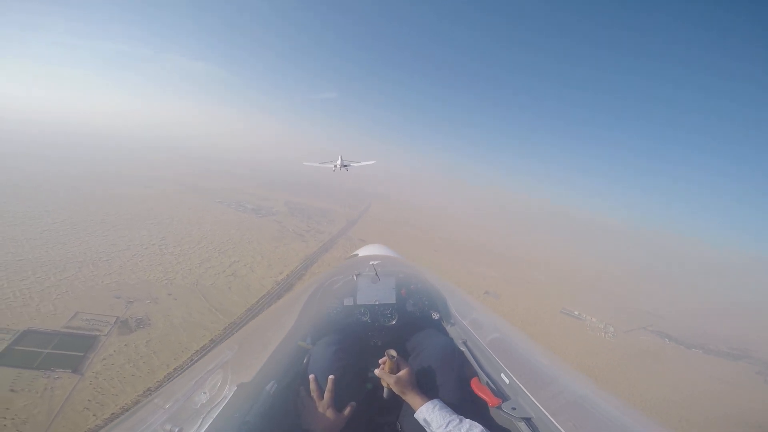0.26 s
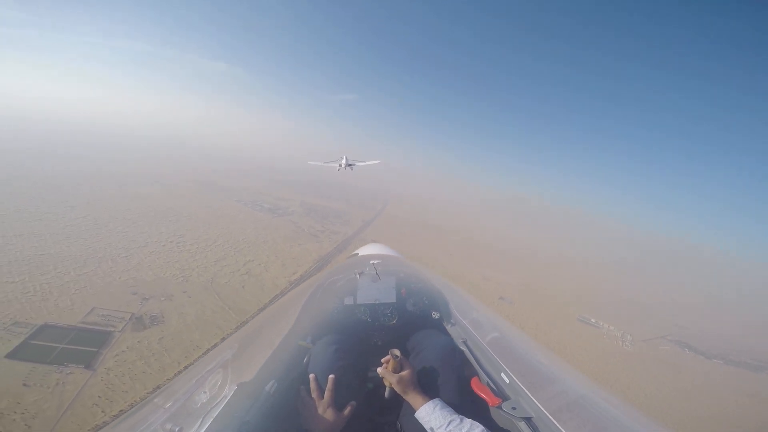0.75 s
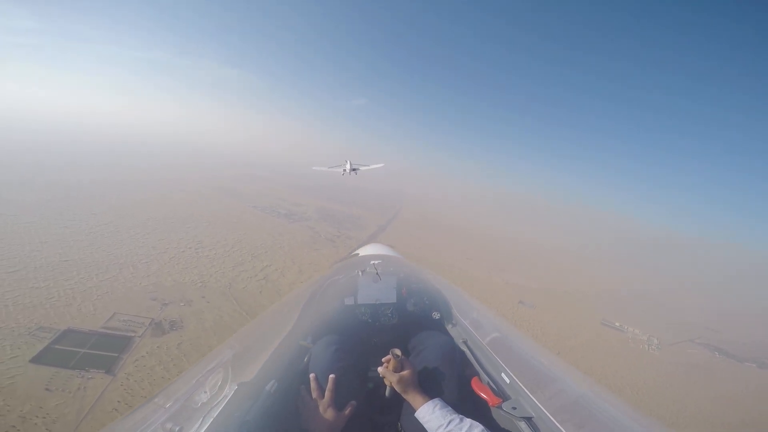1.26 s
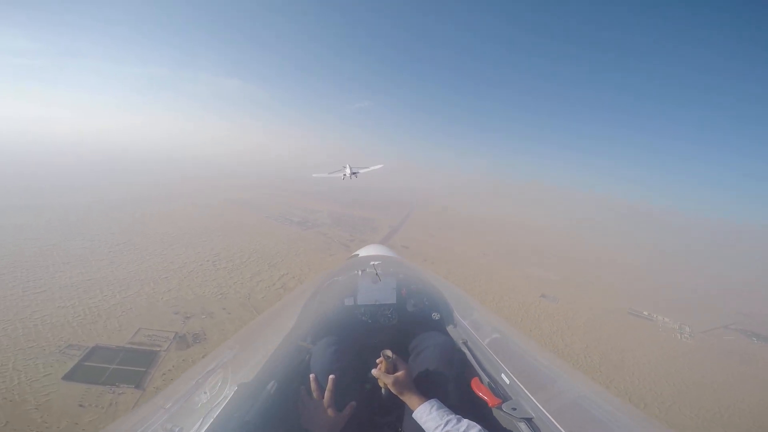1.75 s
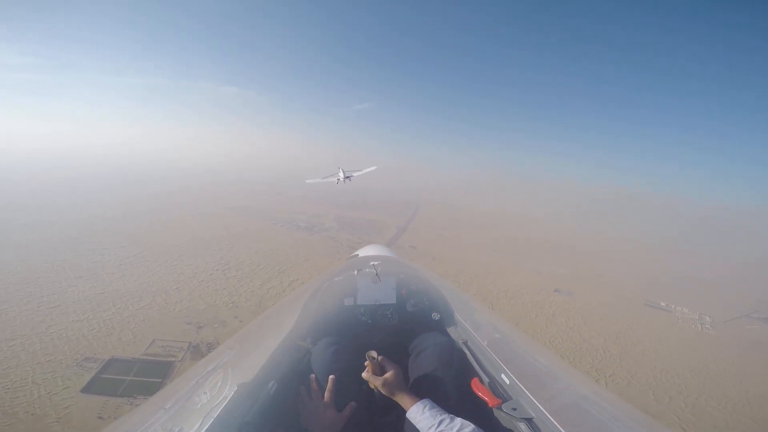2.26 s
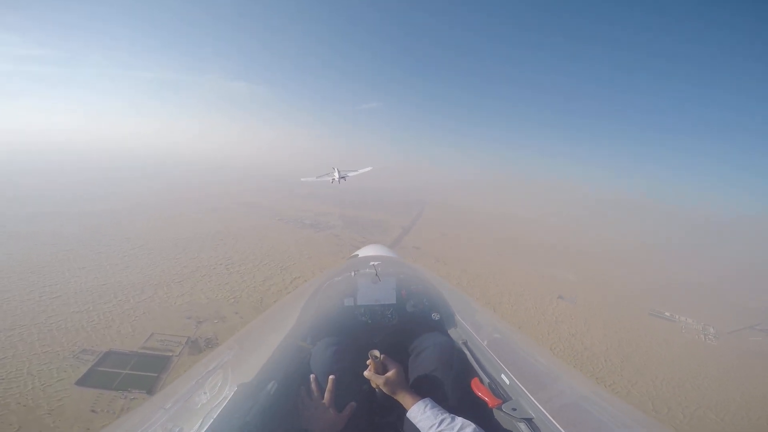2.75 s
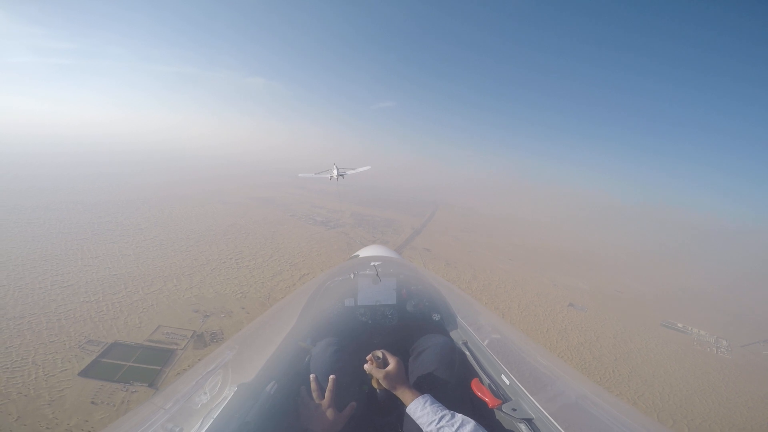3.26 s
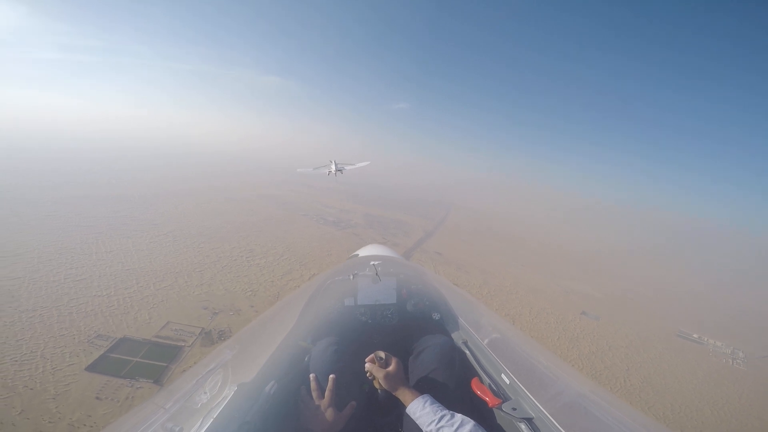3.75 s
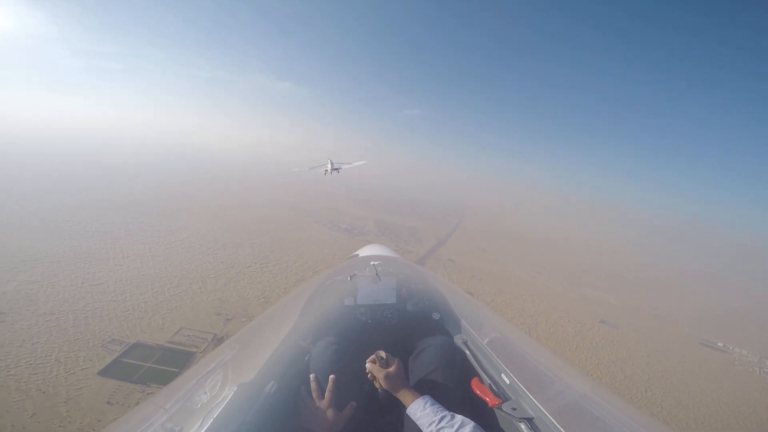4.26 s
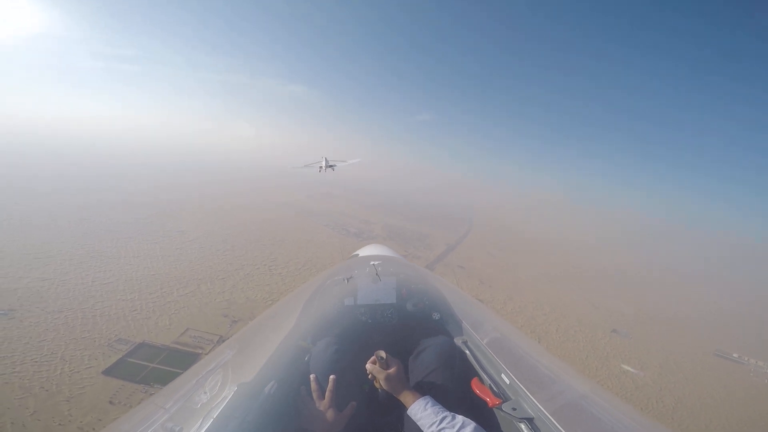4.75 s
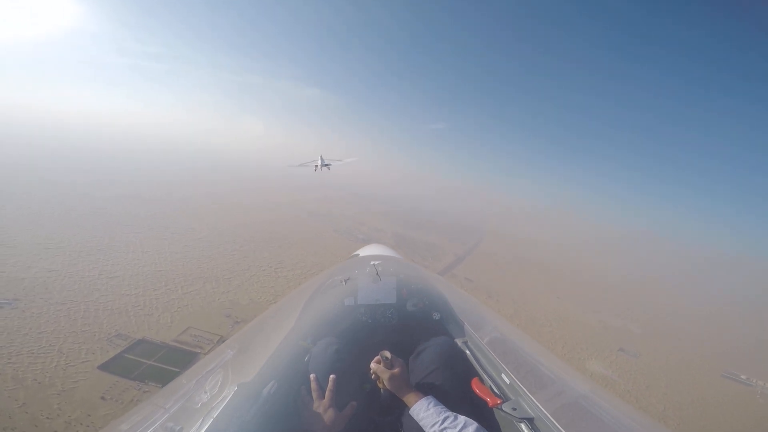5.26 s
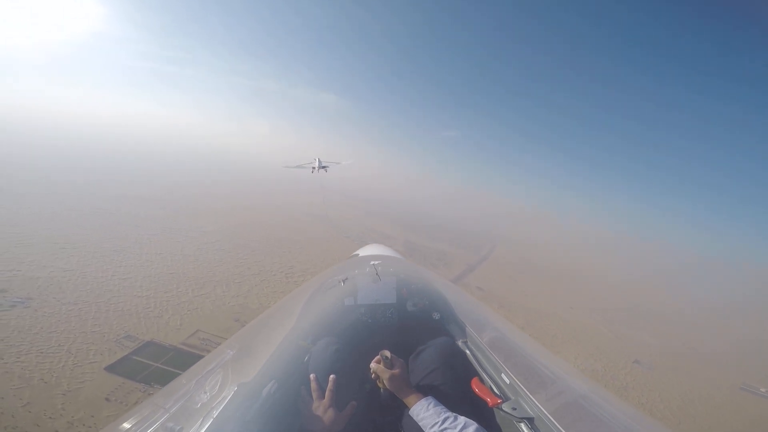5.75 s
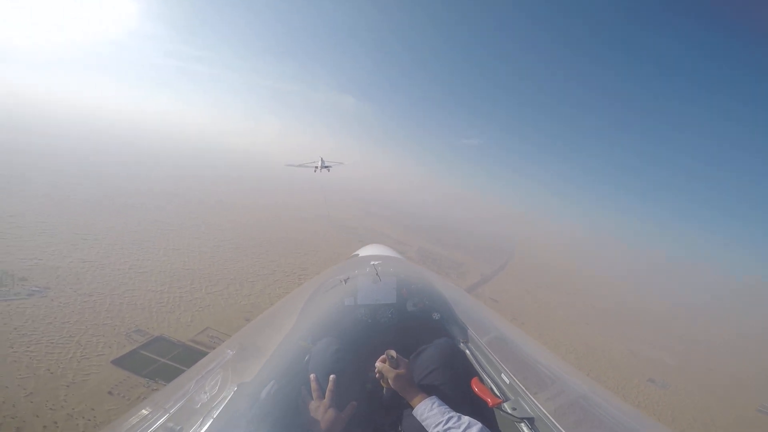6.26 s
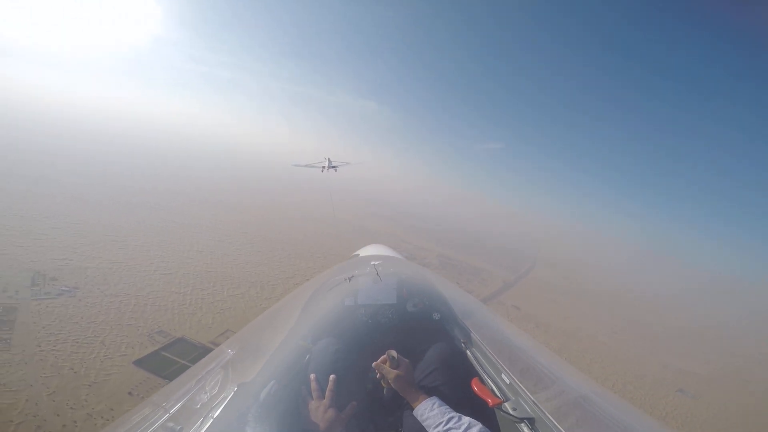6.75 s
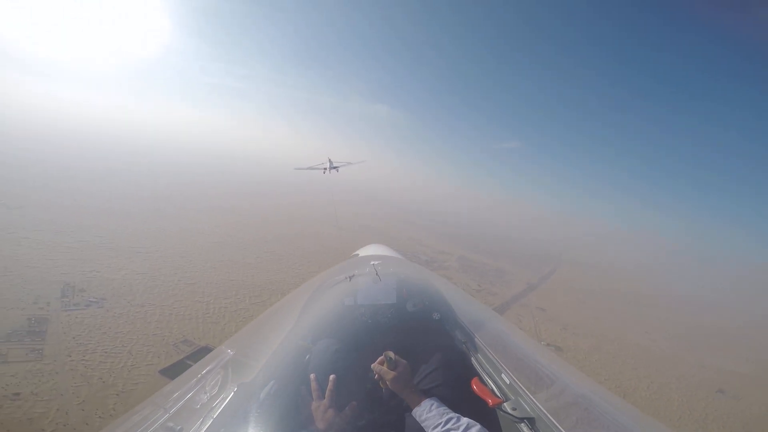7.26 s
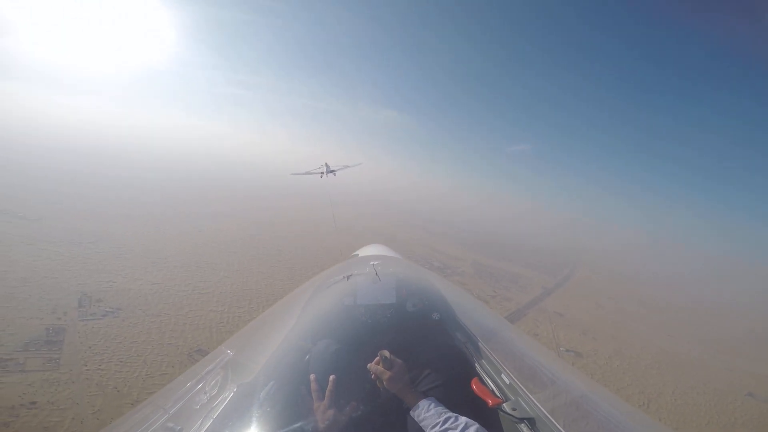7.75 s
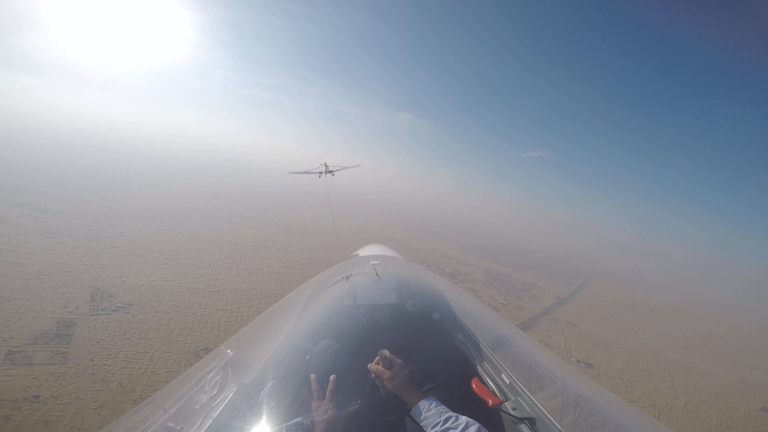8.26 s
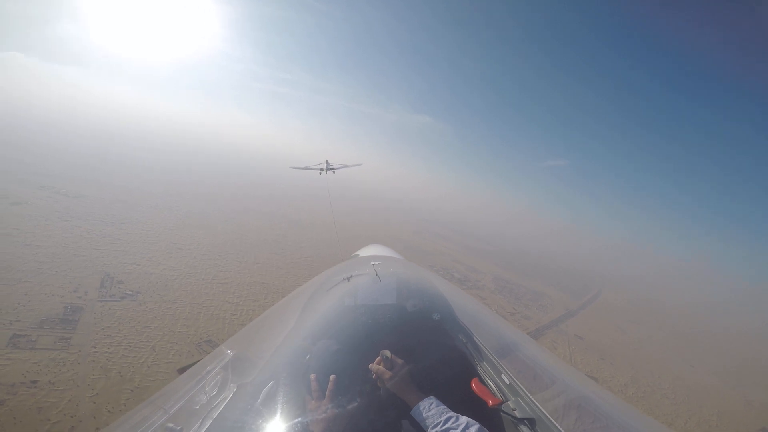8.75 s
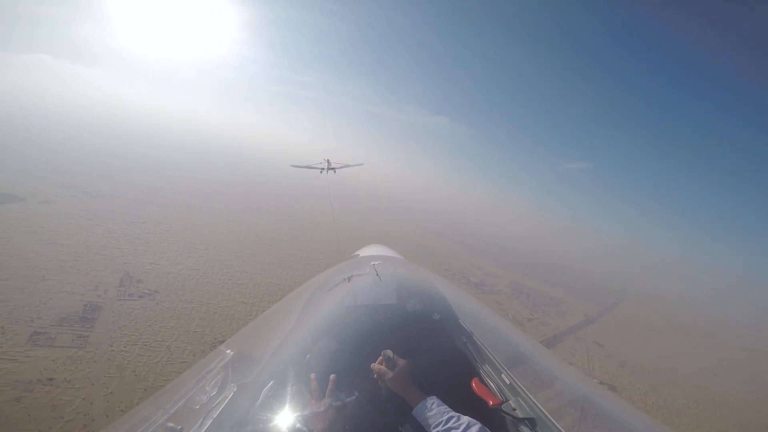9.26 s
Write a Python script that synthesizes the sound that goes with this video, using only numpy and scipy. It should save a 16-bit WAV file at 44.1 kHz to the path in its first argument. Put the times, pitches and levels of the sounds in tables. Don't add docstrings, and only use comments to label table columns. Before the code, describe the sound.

Wind noise runs without pause for about nine and a half seconds, heard by one microphone inside a small camera case in a towed glider. The main body is a steady, dense hiss strongest around three to four kilohertz, joined by vent rush near two kilohertz and canopy roar around one kilohertz; the very top is faint. Below, a fluttering throb near fifty hertz swells irregularly with lumpy buffeting, strongest from 0.3 to 1.6 seconds. From about 2 to 3.5 seconds a sideslip hollows and thins the roar, while the vent draught comes forward and low wash rises slightly. By 4.5 seconds the fuller roar returns. Short bass gusts return near 5.7 and 7.4 to 8.1 seconds, softer than the opening. A very faint panel hum near 220 hertz stays buried. The sound is close, dry and almost mono, with only tiny brief left-right treble differences.

```python
import sys
import numpy as np
from scipy import signal
from scipy.io import wavfile
from scipy.ndimage import uniform_filter1d

SR = 44100
rng = np.random.default_rng(int(sys.argv[2]) if len(sys.argv) > 2 else 0)


def file_out(sig):
    cols = np.atleast_2d(sig).T
    lim = np.clip(cols, -1, 1)
    pcm = np.round(lim * 32767).astype(np.int16)
    wavfile.write(sys.argv[1], SR, pcm)


def attenuation_scalar(level_db):
    decades = np.asarray(level_db, float) / 20
    return 10 ** decades


N = 419391

# start_s, length_s, level_db, pitch_hz
GUSTS = [(0.0, 0.3, -25, 49.2), (.32, .1, -18, 51.1), (0.507, .08, -17.5, 50.8), (.62, 0.12, -22.5, 51.8),
         (0.86, 0.31, -18, 52.6), (1.27, 0.18, -18, 52.1), (1.476, 0.16, -22, 53),
         (2.22, 0.091, -22.5, 51.7), (2.41, 0.21, -26.5, 50.1), (2.903, 0.14, -27, 52.1),
         (3.19, .09, -25, 51.1), (3.38, .17, -23, 52.02), (3.66, 0.096, -25, 52.3),
         (3.829, 0.24, -29, 52.8), (4.067, 0.12, -24.5, 54.7), (4.325, .13, -23, 53.8),
         (4.58, 0.09, -24.5, 54), (4.719, .47, -24.5, 52.4), (5.652, 0.12, -20, 50),
         (5.939, .19, -22.5, 53.8), (6.19, 0.354, -24.5, 53.1), (6.68, 0.28, -27.5, 54),
         (6.999, .11, -26, 51.4), (7.181, .18, -28, 52), (7.429, 0.16, -21.5, 50.5),
         (7.701, .16, -21.5, 52.8), (7.929, 0.23, -21.5, 53), (8.23, .28, -30.5, 53.5),
         (8.59, 0.32, -28, 52.7), (8.97, .52, -24.5, 51.9)]
# time_s, sideslip (0 straight, 1 slipping
FLIGHT = [(0, -.1, 0.3), (.9, .15, .01), (1.6, .01, 0.55), (1.95, .3, 1), (2.3, .9, 0.77),
          (2.7, 1.05, 0.81), (3.3, .9, 0.85), (3.7, .45, .95), (4.2, .15, .8), (4.8, -.1, .45),
          (5.8, -.15, 0.33), (6.6, .01, 0.42), (7.1, .15, .1), (7.8, -.05, 0.39), (8.5, .15, .01),
          (9.51, .01, 0.14)]

# pitch_hz, level_db (per Hz)
BUFFET_COLOUR = [(2, -35), (6, -32), (13, -22), (26, -20), (37, -9), (52, -6), (64, -11.5), (72, -9),
                 (85, -17.5), (108, -23)]
# pitch_hz, level_db (per Hz)
RUSH_STRAIGHT = [(1448, -12), (1754, -2.5), (1916, 0.0), (2034, -1.2), (2083, -1.5), (2131, -2.5),
                 (2185, -0.5), (2250, -3.5), (2293, -14), (2336, -6), (2427, -7.5), (2497, -2)]
# pitch_hz, level_db (per Hz)
RUSH_SLIPPING = [(1448, -14), (1577, -7), (1701, -2), (1846, 0.5), (1943, -0.5), (2072, -1.5), (2180, -3.5),
                 (2260, -6), (2400, -9), (2497, -12)]
# pitch_hz, level_db (per Hz)
ROAR_STRAIGHT = [(371, -11), (516, -10.5), (549, -9.5), (608, -0.3), (645, -0.5), (689, -2.5), (748, 1),
                 (829, -1.5), (882, 0), (1001, -1.5), (1065, -2.5), (1232, -3.5), (1367, -6), (1448, -7)]
# pitch_hz, level_db (per Hz)
ROAR_SLIPPING = [(371, -12), (414, -12.5), (500, -12.5), (613, -7.5), (710, -7), (915, 0.5), (1001, -1.3),
                 (1087, -5.5), (1297, -5.5), (1361, -6.5), (1448, -12)]
# pitch_hz, level_db (per Hz)
WASH_STRAIGHT = [(107, -4), (145, -3.5), (183, -6.5), (225, -3.5), (258, -7), (322, -5), (345, -7.5),
                 (371, -9.5)]
# pitch_hz, level_db (per Hz)
WASH_SLIPPING = [(107, -3), (183, -6), (226, -1), (274, -5.5), (328, -1.5), (349, -1), (371, -15)]
# pitch_hz, level_db (per Hz)
CASE_COLOUR = [(2497, -10), (2637, -7.5), (2729, -12), (2793, -9), (2976, -6), (3090, -6.5), (3219, -6),
               (3348, -2.5), (3461, 0.1), (3870, -0.5), (4021, -1.5), (4123, -4.5), (4204, -11.5),
               (4279, -14)]
# pitch_hz, level_db (per Hz)
SEAM_COLOUR = [(4279, -6), (4344, -4.5), (4398, 0), (4613, -4.5), (4769, 0), (4801, -0.5), (4914, -8.5),
               (5097, -11.5), (5184, -7), (5318, -11), (5512, -8), (5722, -6), (5857, -10.5), (6077, -18)]
# pitch_hz, level_db (per Hz)
HISS_COLOUR = [(6072, -7.5), (6260, -4.5), (6567, -8), (6809, -4), (6992, -5), (7127, -3.5), (7342, -4.5),
               (7730, 0), (7848, -1), (8123, -3.5), (8371, -9), (8618, -7), (8952, -12), (9173, -11.2)]
# pitch_hz, level_db (per Hz)
FIZZ_COLOUR = [(9173, -8), (9765, -6), (10174, -1), (10379, 0.5), (10675, -2.5), (11170, -13.5),
               (11261, -14.5), (12812, -9.9), (13049, -11), (13528, -15.8), (14179, -16.5), (14583, -18.9),
               (15110, -19), (15500, -18.5)]
# time_s, low_hz, high_hz
UNEVEN_BANDS = [(0.672, 5684, 6890), (0.974, 8260, 9646), (2.157, 4240, 5220), (2.157, 5684, 6930),
                (3.131, 13006, 15400), (3.318, 4280, 5167), (3.318, 10249, 11800), (4.479, 4250, 5700),
                (5.479, 14000, 15350), (6.686, 7540, 8980), (6.894, 4250, 5160), (6.894, 6210, 11714),
                (8.381, 4220, 5254), (8.381, 8240, 11060), (8.381, 13092, 15060), (9.287, 4220, 5700),
                (9.287, 10300, 13800)]


def throb():
    t = np.arange(N) / SR
    start_s, length_s, _, pitch_hz = np.transpose(GUSTS)
    wander = rng.standard_normal((N, 2)).T
    waver, flutter = uniform_filter1d(uniform_filter1d(wander, 2000), 2000)
    hz = np.interp(t, start_s + length_s / 2, pitch_hz) * (1 + 0.0328 * evened(waver))
    swing = uniform_filter1d(gusts(), size=900) * attenuation_scalar(1.1 * evened(flutter))
    return np.sqrt(2) * swing * np.sin(2 * np.pi * np.cumsum(hz) / SR)


def gusts():
    swell_s, calm_db = 0.056, -33
    t = np.linspace(0, N / SR, num=4000)
    start_s, length_s, level_db, _ = np.transpose(GUSTS)[:, :, None]
    to_edge_s = np.minimum(t - start_s, start_s + length_s - t)
    edge = np.clip(to_edge_s / swell_s + 0.5, 0, 1)
    each = attenuation_scalar(level_db) * np.sin(np.pi / 2 * edge) ** 2
    swing = np.maximum(attenuation_scalar(calm_db), each.max(axis=0))
    return np.interp(np.arange(N) / SR, t, swing)


def buffet():
    hz, t = spectrum_grid(size=4096)
    linger = int(0.41 * SR)
    power = uniform_filter1d(uniform_filter1d(gusts() ** 2, linger), linger)
    rise_db = 10 * np.log10(power / power.mean())
    level_db = -29 + 0.74 * np.interp(t, np.arange(N) / SR, rise_db)
    field_db = colour(BUFFET_COLOUR, hz)[:, None] + level_db
    return turbulence(field_db, patchy_db=0.95, flicker_db=0.67, patch_bins=2.7, patch_frames=8.4)


def rush():
    hz, t = spectrum_grid(size=1024)
    level_db = following(t, steady=-23, per_slip=-0.15, per_draught=2.5)
    field_db = blended(RUSH_STRAIGHT, RUSH_SLIPPING, hz, column(FLIGHT, 1, t)) + level_db
    return turbulence(field_db, patchy_db=0.4, flicker_db=0.34, patch_bins=6.5, patch_frames=12)


def roar():
    hz, t = spectrum_grid(size=2048)
    hollow = following(t, steady=0.11, per_slip=1.34, per_draught=-0.4)
    level_db = following(t, steady=-26, per_slip=-1.5, per_draught=-1.96)
    field_db = blended(ROAR_STRAIGHT, ROAR_SLIPPING, hz, hollow) + level_db
    return turbulence(field_db, patchy_db=0.41, flicker_db=0.16, patch_bins=8.8, patch_frames=12)


def wash():
    hz, t = spectrum_grid(size=4096)
    level_db = following(t, steady=-35.5, per_slip=2, per_draught=-0.7)
    field_db = blended(WASH_STRAIGHT, WASH_SLIPPING, hz, column(FLIGHT, 1, t)) + level_db
    return turbulence(field_db, patchy_db=0.4, flicker_db=0.31, patch_bins=8, patch_frames=7.2)


def hiss():
    hz, t = spectrum_grid(size=1024)
    swell_db = following(t, steady=0.16, per_slip=0.1, per_draught=-0.5)
    case_db = colour(CASE_COLOUR, hz)[:, None] - 17.5 + swell_db
    case = turbulence(case_db, patchy_db=0.32, flicker_db=0.16, patch_bins=7.2, patch_frames=17)
    top_power = 0
    for points, level_db in [(SEAM_COLOUR, -32), (HISS_COLOUR, -36), (FIZZ_COLOUR, -39)]:
        top_power = top_power + attenuation_scalar(colour(points, hz) + level_db) ** 2
    top_db = 10 * np.log10(top_power)
    top_db = np.where(hz < 15290, top_db, -200)[:, None] + swell_db
    return case + turbulence(top_db, patchy_db=0.46, flicker_db=0.39, patch_bins=16, patch_frames=3.2)


def hum():
    pitch_hz, width_hz, level_db = 222.9, 18, -42
    turn = np.exp(2j * np.pi * pitch_hz * np.arange(N) / SR)
    r = np.exp(-np.pi * width_hz / SR)
    slow = signal.lfilter([1], [1, -2 * r, r * r], rng.standard_normal(N) / turn)
    return attenuation_scalar(level_db) * evened((slow * turn).real)


def turbulence(field_db, patchy_db, flicker_db, patch_bins, patch_frames):
    bins, frames = field_db.shape
    real, imaginary, patches = rng.standard_normal((frames, bins, 3)).T
    patches = uniform_filter1d(patches, int(patch_bins), 0)
    patches = evened(uniform_filter1d(patches, int(patch_frames), 1))
    flicker = rng.standard_normal(frames)
    strength = attenuation_scalar(field_db + patchy_db * patches + flicker_db * flicker)
    size = 2 * (bins - 1)
    spectra = (real + 1j * imaginary) * strength
    noise = signal.istft(spectra, nperseg=size, noverlap=3 * size // 4)[1][:N]
    return evened(noise) * np.sqrt(np.mean(np.sum(attenuation_scalar(field_db) ** 2, axis=0)))


def blended(straight, slipping, hz, slip):
    slip = np.clip(slip, -0.5, 1.3)
    return np.outer(colour(straight, hz), 1 - slip) + np.outer(colour(slipping, hz), slip)


def following(t, steady, per_slip, per_draught):
    return steady + per_slip * column(FLIGHT, 1, t) + per_draught * column(FLIGHT, 2, t)


def colour(points, hz):
    f, db = np.transpose(points)
    db = np.interp(np.log(hz + 1), np.log(f + 1), db, left=-200, right=-200)
    return db - 10 * np.log10(np.sum(attenuation_scalar(db) ** 2))


def spectrum_grid(size):
    return np.fft.rfftfreq(size, 1 / SR), np.arange(4 * N // size + 5) * size / (4 * SR)


def column(rows, index, t):
    rows = np.asarray(rows)
    return np.interp(t, rows[:, 0], rows[:, index])


def evened(x):
    return x / np.sqrt(np.mean(x ** 2) + 1e-20)


def scene():
    air = throb() + buffet() + wash() + hum() + roar() + rush() + hiss()
    return np.array([air, air])


def uneven_treble(mono):
    hop, offset = 1024, 966
    side, n = np.zeros(N), np.arange(2 * hop)
    window = np.sin(np.pi * (n + 0.5) / (2 * hop))
    backwards = mono[::-1]
    for time_s, low_hz, high_hz in UNEVEN_BANDS:
        start = offset + hop * (round((time_s * SR - offset) / hop) - 1)
        k = np.arange(int(low_hz * 2 * hop / SR), int(high_hz * 2 * hop / SR))
        waves = window * np.cos(np.pi / hop * np.outer(k + 0.5, n + 0.5 + hop / 2))
        strengths = waves @ backwards[start:start + 2 * hop]
        side[start:start + 2 * hop] += strengths @ waves * 2 / hop
    return attenuation_scalar(-3.0) * side


def low_pass(x):
    return signal.sosfilt(signal.butter(12, 15380, fs=SR, output="sos"), x)


def record(dry):
    side = uneven_treble(dry[0])
    mix = dry + np.array([side, -side])
    return low_pass(mix)


dry = scene()
out = record(dry)
file_out(out)
```